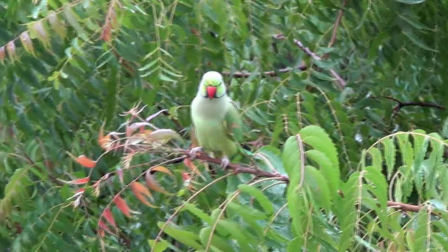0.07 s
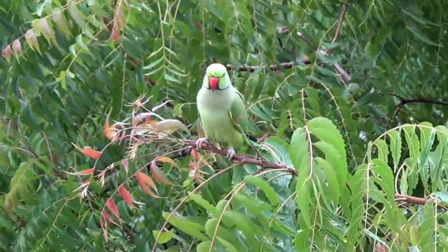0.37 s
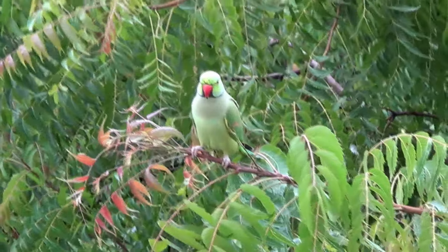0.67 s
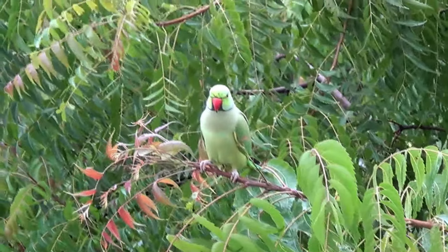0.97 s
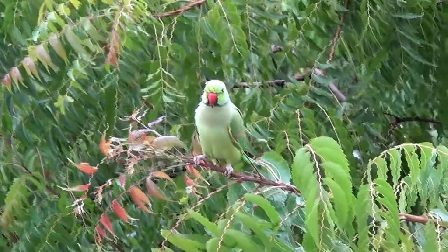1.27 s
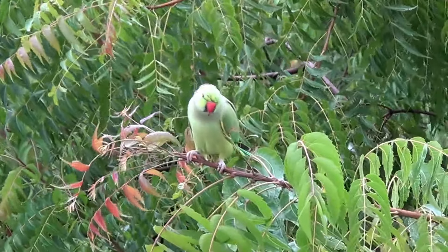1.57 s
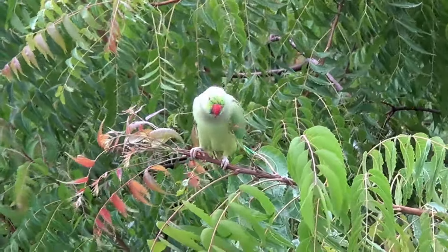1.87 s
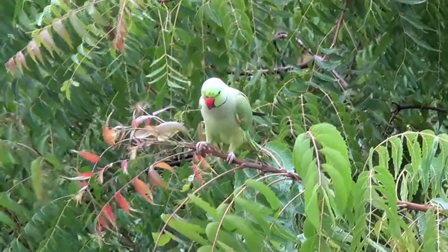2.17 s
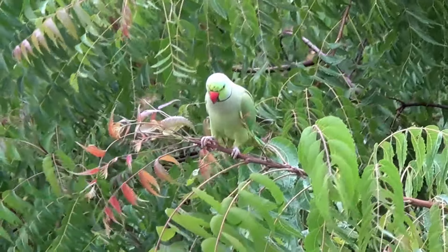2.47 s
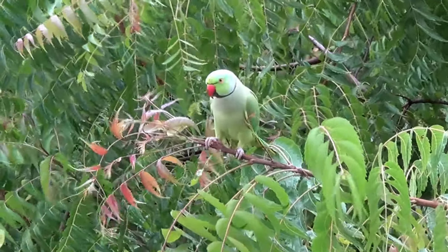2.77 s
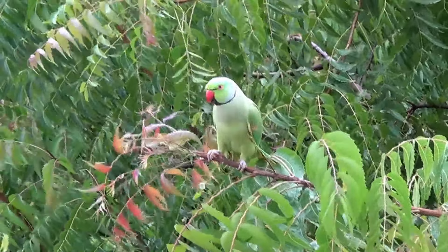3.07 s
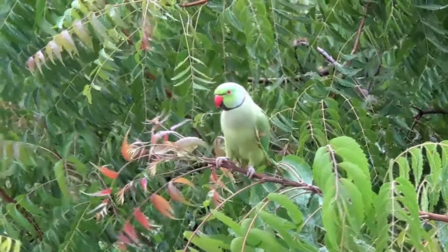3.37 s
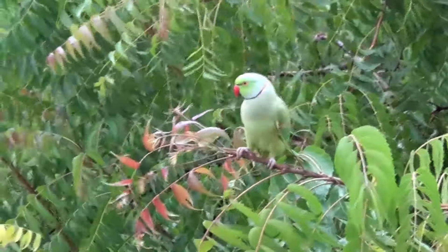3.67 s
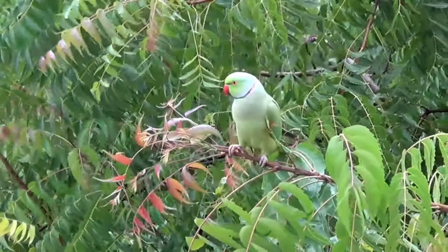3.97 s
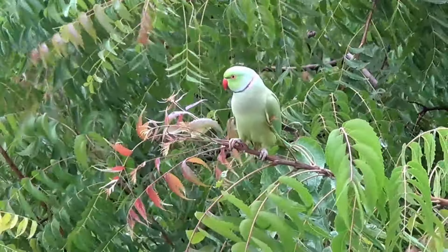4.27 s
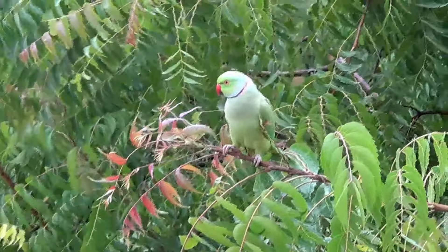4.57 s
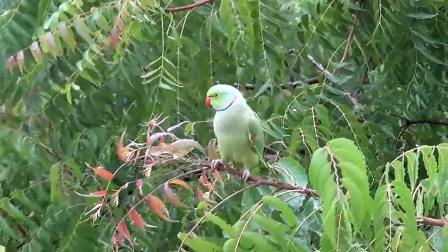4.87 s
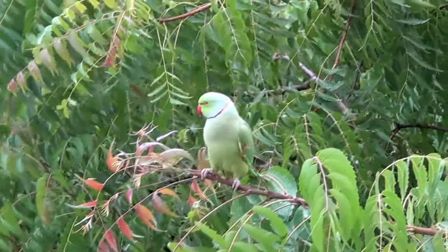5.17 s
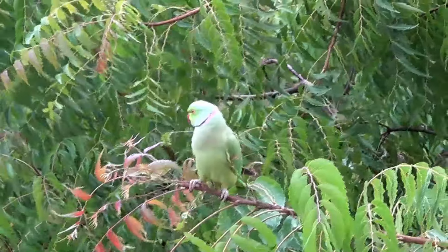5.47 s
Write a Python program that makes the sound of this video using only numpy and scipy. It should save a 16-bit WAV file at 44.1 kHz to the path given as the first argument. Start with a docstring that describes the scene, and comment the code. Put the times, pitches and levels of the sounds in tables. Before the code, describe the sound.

A soft outdoor hiss and low rumble run throughout, with small birds whistling faintly far away. A parakeet calls from a tree, slightly to the right, each note followed by a short, leafy echo. Five clear, high notes come at about 0.3, 0.6, 0.8, 1.5 and 1.9 seconds, each starting hoarsely, leaping up in pitch and falling away. From 2.0 to 3.4 seconds the bird gives five louder, brighter screeches with a fast, rasping trill, about three a second, the last one dying away quickly. The whole sound ducks a little under the loudest of them and then recovers. A pause follows, in which a faint low drone swells around 4 seconds. Two softer squeals with more echo come at about 4.6 and 4.9 seconds, the first ending in a warble, the second falling. The background and a distant whistle remain until about 5.6 seconds.

```python
"""A parakeet calling from a tree

Five clear arched notes come first, then five louder trilled screeches, then two softer squeals.
Each is a tone with overtones, shaped by the throat and beak, scattered by leaves and echoed around.
Small birds whistle far off over a low outdoor rumble and a faint drone.
The camera's gain control turns everything down during the loudest screeches."""
import sys
import numpy as np
from scipy import signal
from scipy.fft import rfft, irfft, next_fast_len
from scipy.io import wavfile
from scipy.ndimage import uniform_filter1d, map_coordinates

SR = 44100
rng = np.random.default_rng(int(sys.argv[2]) if len(sys.argv) > 2 else 0)


def output_pcm(signal):
    """Save a mono or channel-first signal as 16-bit PCM at the path in sys.argv[1].

    Samples are clipped to [-1, 1] before scaling.
    """
    pcm = np.clip(np.atleast_2d(signal).T, -1, 1) * 32767
    wavfile.write(sys.argv[1], SR, np.round(pcm).astype(np.int16))


N = 248283
T = np.arange(N) / SR
TOP_HZ = 15665  # nothing higher is heard


def amp(db):
    """Turn decibels into a gain."""
    return 10 ** (np.asarray(db) / 20)


def unit(x):
    """Scale a sound to an average (rms) level of 1."""
    return x / np.sqrt(np.mean(x ** 2) + 1e-20)


def along(points, hz):
    """Read between rows of (Hz, value), spaced by octaves."""
    f, v = np.transpose(points)
    return np.interp(np.log(hz + 1), np.log(f + 1), v)


def wobble(rate, size):
    """A smooth random curve through `rate` points a second."""
    return map_coordinates(rng.standard_normal(int(size * rate / SR) + 4), [np.arange(size) * rate / SR])


def filtered(x, response):
    """Multiply each frequency in x by response(hz)."""
    m = next_fast_len(N + SR // 2)
    return irfft(rfft(x, m) * response(np.fft.rfftfreq(m, 1 / SR)), m)[..., :N]


def spread(mid, side):
    """Make left and right from what they share (mid) and what sets them apart (side)."""
    return np.array([mid + side, mid - side])


def background(level_db, patchy_db, rumble_hz=3000):
    """A smooth outdoor hiss over a low rumble that swells and fades."""
    # Each row: frequency in Hz, relative strength of the noise in dB.
    colour = [(15, -73), (25, -30), (96, -14), (204, -1), (457, -6.5), (722, -4), (1340, -8), (1900, -5),
              (2850, -7), (3170, -7.5), (3830, -6.5), (6920, -20.5), (10400, -19), (13200, -29),
              (15500, -27)]
    # Each row: frequency in Hz, how alike left and right are (1 is the same).
    alike = [(60, 0.92), (180, 1), (550, 0.81), (1650, 0.67), (4970, 0.81), (15000, 1)]
    # Each row: time in seconds, relative level of the rumble in dB.
    swells = [(.1, -40.5), (1.45, -41), (1.65, -36.5), (1.92, -41), (2.6, -41.5), (3.7, -44), (4.55, -43),
              (5.3, -40)]

    def mid_and_side(hz):
        angle = np.arccos(np.clip(along(alike, hz), -1, 1)) / 2
        return amp(along(colour, hz)) * [np.cos(angle), np.sin(angle)]

    spectrum = signal.stft(rng.standard_normal((2, N)), nperseg=2048)[2]
    patches = uniform_filter1d(rng.standard_normal(spectrum.shape[1:]), size=3, axis=0)
    patches = uniform_filter1d(patches, size=8, axis=1)  # slightly louder and softer spots
    noise = signal.istft(spectrum * amp(patchy_db * unit(patches)), nperseg=2048)[1][:, :N]
    air = unit(spread(*filtered(noise, mid_and_side)))
    low = filtered(air, lambda hz: 1 / (1 + (hz / rumble_hz) ** 2))
    swell_db = np.interp(T, *np.transpose(swells))
    return amp(level_db) * (air - low + low * amp(swell_db - np.median(swell_db)))


def drone(centre_hz, width_hz):
    """A far drone: a narrow band of low noise that swells and fades."""
    # Each row: time in seconds, level in dB.
    levels = [(3.3, -78), (3.7, -61), (4.0, -56.5), (4.7, -61), (5.3, -64)]
    hum = filtered(rng.standard_normal(N), lambda hz: np.exp(-((hz - centre_hz) / width_hz) ** 2))
    return unit(hum) * amp(np.interp(T, *np.transpose(levels)))


def surroundings(x, leaves_db, leaves_fade_s, tail_db):
    """Nearby leaves scatter a sound quickly, and a long wash of echoes follows."""
    # Each row: frequency in Hz, seconds the echoes take to fade by 60 dB.
    fade_times = [(500, 0.98), (2000, 0.76), (4000, 0.73), (9000, 0.49), (15000, 0.36)]
    # Stereo width of the echoes. Each row: frequency in Hz, side gain in dB.
    width = [(1000, -7), (4500, -7.5), (8000, -4), (13000, -38)]
    t = np.arange(SR) / SR
    leaves = rng.standard_normal((2, SR)) * amp(-60 * t / leaves_fade_s) * (t > .002)
    bands, times, spectrum = signal.stft(rng.standard_normal((2, SR)), SR, nperseg=256)
    fade = amp(-60 * times / along(fade_times, bands)[:, None])
    tail = signal.istft(spectrum * fade, SR, nperseg=256)[1][:, :SR]
    tail *= 1 - np.exp(-t / 0.015)  # the echoes take a moment to build
    echoes = (amp(leaves_db) * unit(leaves) + amp(tail_db) * unit(tail)) / np.sqrt(SR)
    mid, side = signal.fftconvolve(x[None], echoes, axes=1)[:, :N]
    return spread(mid, filtered(side, lambda hz: amp(along(width, hz))))


def surface_echo(x, delay_s, echo_db, dull_hz, blur_db=-3, blur_fade_s=0.053):
    """A rough surface some metres off sends back one dull, blurred echo."""
    t = np.arange(SR // 10) / SR
    blur = unit(rng.standard_normal(len(t)) * amp(-60 * t / blur_fade_s)) / np.sqrt(len(t))
    returned = amp(echo_db) * (x + amp(blur_db) * signal.fftconvolve(x, blur)[:N])
    return filtered(returned,
                    lambda hz: np.exp(-2j * np.pi * hz * delay_s) / np.sqrt(1 + (hz / dull_hz) ** 4))


def whistles(rows, waver):
    """Pure tones that slide in pitch, starting and ending softly."""
    out = np.zeros(N)
    for start, length, start_hz, end_hz, db in rows:
        progress = (T - start) / length
        live = (progress > 0) & (progress < 1)
        progress = progress[live]
        hz = (start_hz + (end_hz - start_hz) * progress) * (1 + waver * wobble(184, len(progress)))
        swell = np.sqrt(2 * np.sin(np.pi * progress))
        out[live] += amp(db) * swell * np.sin(2 * np.pi * np.cumsum(hz) / SR)
    return out


def far_birds(direct_db):
    """Small birds whistle so far off that they arrive mostly as echo."""
    # Each row: start and length in seconds, first and last pitch in Hz, relative level in dB.
    calls = [(.07, 0.082, 2420, 2117, -41.5), (.44, 0.099, 1114, 1116, -48), (1.2, .095, 2520, 2264, -40.5),
             (1.40, 0.11, 1350, 1310, -43), (1.65, .16, 1680, 1560, -43), (3.735, .025, 2000, 1800, -55),
             (4.11, .09, 4520, 4060, -47), (4.32, .02, 1054, 910, -43), (4.45, .06, 4480, 3940, -49),
             (5.35, 0.051, 4340, 5080, -40)]
    song = whistles(calls, waver=0.018)
    return amp(direct_db) * song + surroundings(song, leaves_db=3.5, leaves_fade_s=0.036, tail_db=-1.0)


def note(contour, voicing, jitter=0.0067, trill_jitter=0.031, catch_db=15, throb_db=10):
    """One parakeet note: a tone and its overtones, swung by the trill and shaped by the throat."""
    # The throat and open beak. Each row: frequency in Hz, gain in dB.
    throat = [(900, -1), (1500, -16), (2400, -7.5), (3000, -1.5), (3700, 2), (4800, -5.5), (5700, -7),
              (7000, -18), (8200, -7.5), (9600, -6), (11500, -15.5), (13000, -24), (15500, -54)]
    # Each row: frequency in Hz, change in dB with the head fully turned away.
    head_turn = [(2000, -6), (4500, 6), (6500, -6), (9000, 8.5), (10500, 12), (12000, 26.5), (15000, -5)]
    times, *columns = np.transpose(contour)
    crest, trill_hz, start_db, end_db, rasp_db, odd_db, turned = voicing
    live = (T > times[0]) & (T < times[-1])
    t = T[live]
    pitch, level_db, depth = [uniform_filter1d(np.interp(t, times, c), size=260) for c in columns]
    bright_db = np.linspace(start_db, end_db, len(t))
    # The trill has pointed crests and round troughs. A push of loudness comes just before each crest.
    swing, push = [1 - 2 * np.abs(np.sin(np.pi * trill_hz * (t + lead_s - crest))) ** 1.4
                   for lead_s in (0, 0.0017)]
    hz = pitch * np.exp(depth * swing + (jitter + trill_jitter * depth) * wobble(502.2, len(t)))
    phase = 2 * np.pi * np.cumsum(hz) / SR
    # A soft start is hoarse until the voice catches. So is a low pitch, where the membrane goes slack.
    catch_s, soft_db, slack_hz, slack_db, rasp_hz = 0.1, -8, 1450, 8, 900
    catching = np.exp(-((t - times[0]) / catch_s) ** 2) / (1 + amp(level_db - soft_db) ** 2)
    slack = 1 / (1 + (pitch / slack_hz) ** 10)
    rasp = amp(rasp_db + catch_db * catching + slack_db * slack)
    tone = np.zeros(len(t))
    for k in range(1, 13):  # harmonic k sounds at k times the pitch
        source_db = odd_db * (k % 2) + bright_db * np.log2(max(k, 2) / 2) - max(k - 2, 0)
        gain_db = source_db + along(throat, k * hz) + turned * along(head_turn, k * hz)
        rough = rasp * (k / 2) ** 0.8
        noise = wobble(rasp_hz, len(t)) + 1j * wobble(rasp_hz, len(t))
        flutter = (1 + rough * noise) / np.sqrt(1 + 2 * rough ** 2)
        tone += amp(gain_db) * (k * hz < TOP_HZ) * np.real(flutter * np.exp(1j * k * phase))
    edges = np.clip(np.minimum(t - times[0], times[-1] - t) / 0.001, 0, 1)
    out = np.zeros(N)
    out[live] = tone * amp(level_db + throb_db * depth * push) * edges
    return out


def arch(start, length, top_hz, scoop, db, rise_s=.04, trill_depth=0.0051):
    """The path of a clear note: a quick leap in pitch, then a fall that fills the rest of the note."""
    # Each row: stage (0 start, 1 top, 2 end), share of the top pitch, level change in dB.
    shape = [(0, .49, -14.5), (0.391, .61, -6.5), (.7, 0.99, 1.5), (.95, 0.97, -3), (1.09, 0.97, -2),
             (1.29, .86, -0.5), (1.58, .745, -4.5), (1.83, .62, 0.5), (2, .54, -13)]
    stages, ratio, shape_db = np.transpose(shape)
    t = np.arange(0, length, 1 / SR)
    stage = np.interp(t, [0, rise_s, length], [0, 1, 2])
    sag = 1 - scoop * np.exp(-((stage - 1.29) / 0.21) ** 2)  # a dip early in the fall
    pitch = top_hz * np.interp(stage, stages, ratio) * sag
    level_db = db + np.interp(stage, stages, shape_db)
    return np.column_stack([start + t, pitch, level_db, np.full(len(t), trill_depth)])


def clear_notes(trill_hz=91.2, rasp_db=-15, odd_db=-1.7, turned=0.041):
    """Arched notes with a hoarse start, the bird facing forward. Gives (sound, head turn) for each."""
    # Each row: start and length in seconds, top pitch in Hz, dip as a share of the pitch,
    # relative level in dB, first and last brightness in dB per octave.
    calls = [ (.274, 0.15, 2552, .05, -8, .5, 2), (.562, 0.14, 2553, 0.088, -6.5, -1, 2.4),
             (.842, 0.13, 2482, 0.083, -6.5, -1.5, 1.5), (1.452, .152, 2468, 0, -8.5, -5.5, -0.046),
             (1.853, 0.13, 2414, 0.053, -8.5, -4, 0.39), ]
    return [(note(arch(*shape), (shape[0], trill_hz, start_db, end_db, rasp_db, odd_db, turned)), turned)
            for *shape, start_db, end_db in calls]


def leap_and_trill(start, length, rise_s, hold_s, drop_s, top_hz, settled_hz, db, fade_db, depth):
    """The path of a screech: the pitch leaps, holds, settles as the trill swells, drops as it dies."""
    low_hz, settle_s = 1115, .024
    trill_wait_s, trill_swell_s = .018, .048
    attack_s, release_s, edge_db = 0.021, 0.015, 14.5
    t = np.arange(0, length, 1 / SR)
    ramp = lambda u: np.clip(u, 0, 1)
    rising = np.sin(np.pi / 2 * ramp(t / rise_s))
    lasting = ramp((length - t) / drop_s)
    aim_hz = settled_hz + (top_hz - settled_hz) * np.exp(-np.maximum(t - rise_s - hold_s, 0) / settle_s)
    pitch = low_hz + (aim_hz - low_hz) * rising ** 2 * lasting
    effort = ramp(t / attack_s) * ramp((length - t) / release_s)
    level_db = db - fade_db * t / length - edge_db * (1 - effort)
    trill = depth * ramp((t - hold_s - trill_wait_s) / trill_swell_s) * lasting ** 2
    return np.column_stack([start + t, pitch, level_db, trill])


def screeches(turned=0.095):
    """Loud, bright, deeply trilled notes. Gives (sound, head turn) for each."""
    # Each row: start, length, rise, hold and drop in seconds, top and settled pitch in Hz, relative
    # level and fade in dB, trill depth as a share of the pitch. Then the voicing: time of one trill
    # crest in seconds, trill rate in Hz, first and last brightness in dB per octave, rasp in dB,
    # gain of the odd harmonics in dB.
    calls = [ (2.028, 0.2, 0.061, 0, 0.044, 2036, 2092, 0.5, 5, 0.19, 2.05, 102.5, 5.4, 4.5, -16.5, -5),
             (2.342, 0.16, .019, 0.00027, 0.027, 2525, 1890, 0.5, 5, 0.26, 2.46, 91.2, 4.8, 4, -14.5, -4.5),
             (2.633, 0.15, 0.022, 0.00064, 0.027, 2245, 1726, -0.5, 6, 0.3, 2.65, 85.9, 6.2, 3, -17.5, -5),
             (2.945, .179, .015, 0.00073, 0.029, 2366, 1748, -1.5, 3, 0.288, 3.041, 82.2, 3.2, -.5, -15, -4),
             (3.282, 0.14, 0.016, .029, 0.018, 2352, 1502, -0.5, 10.5, 0.17, 3.9, 102.6, 1.4, 0.5, -31, -2.5),
             ]
    return [(note(leap_and_trill(*row[:10]), (*row[10:], turned), trill_jitter=0.019, throb_db=10.5),
             turned) for row in calls]


def squeals():
    """Softer notes that start cleanly, with the head turned aside. Gives (sound, head turn) for each."""
    # Each row: time in seconds, pitch in Hz, relative level in dB, trill depth as a share of the pitch.
    rising = [(4.589, 1866, -26, 0), (4.612, 1944, -8, .01), (4.635, 2417, -10, 0),
              (4.652, 2534, -8, 0.0028), (4.686, 2500, -10.5, 0.052), (4.71, 2247, -13, 0.211),
              (4.78, 1907, -14.5, 0.26), (4.806, 1517, -19, 0.16)]
    falling = [(4.932, 1494, -28, 0.011), (4.945, 2580, -14.5, 0.0025), (4.975, 2765, -21.5, 0),
               (4.988, 2415, -11.5, 0.0054), (5.021, 2260, -10.5, 0.029), (5.047, 1985, -11, 0),
               (5.064, 1522, -23, .03)]
    # Each row: one squeal's voicing, laid out as for a screech, then head turn from 0 to 1.
    voicings = [(4.731, 45.9, -13, -7.5, -12, 0.5, 0.74), (4.999, 89.6, -21, -4.5, -9, 0.5, 0.91)]
    return [(note(contour, voicing, catch_db=-4, jitter=0.0099, throb_db=2.5), voicing[-1])
            for contour, voicing in zip([rising, falling], voicings)]


def parakeet(facing_share=0.15):
    """It sits a little to the right. Turned away, it throws more of its voice at an echoing surface."""
    # A second, thin tone in the first note.
    # Each row: start and length in seconds, first and last pitch in Hz, level in dB.
    thin_tone = [(.30, 0.06, 3510, 3030, -19.5)]
    # Each row: frequency in Hz, dB added on the right and taken off the left.
    lean = [(1000, 0.5), (2200, 0.8), (4500, 1), (8000, 0.7), (12000, 0)]
    notes = clear_notes() + screeches() + squeals()
    voice = sum(sound for sound, turned in notes) + whistles(thin_tone, waver=0.0049)
    thrown = sum(sound * np.interp(turned, [0, 1], [facing_share, 1]) for sound, turned in notes)
    voice += surface_echo(thrown, delay_s=0.054, echo_db=-7, dull_hz=5130)
    heard = voice + surroundings(voice, leaves_db=-9, leaves_fade_s=0.068, tail_db=-10)
    return filtered(heard, lambda hz: amp(np.outer([-1, 1], along(lean, hz))))


def scene():
    """The birds over the outdoor background."""
    birds = parakeet() + far_birds(direct_db=1.5)
    return birds + drone(centre_hz=98.0, width_hz=22) + background(level_db=-35.5, patchy_db=2.0)


def gain_control(x, limit_db, release_db_per_s):
    """Turns the sound down at once when it passes the limit, then slowly back up."""
    power = np.abs(uniform_filter1d(np.mean(x ** 2, axis=0), size=260))
    excess_db = np.maximum(10 * np.log10(power + 1e-12) - limit_db, 0)
    cut_db = np.maximum.accumulate(excess_db + release_db_per_s * T) - release_db_per_s * T
    return x * amp(-uniform_filter1d(cut_db, size=130))


def record(dry):
    """The camera fades the sound in, holds down loud moments and cuts the highest treble."""
    start_s, fade_s = 0.063, 0.017
    fade_in = np.clip((T - start_s) / fade_s, 0, 1)
    held = gain_control(dry, limit_db=-9.5, release_db_per_s=22.5) * fade_in
    return filtered(np.clip(held, -1, 1), lambda hz: hz < TOP_HZ)


dry = scene()
out = record(dry)
output_pcm(out)
```